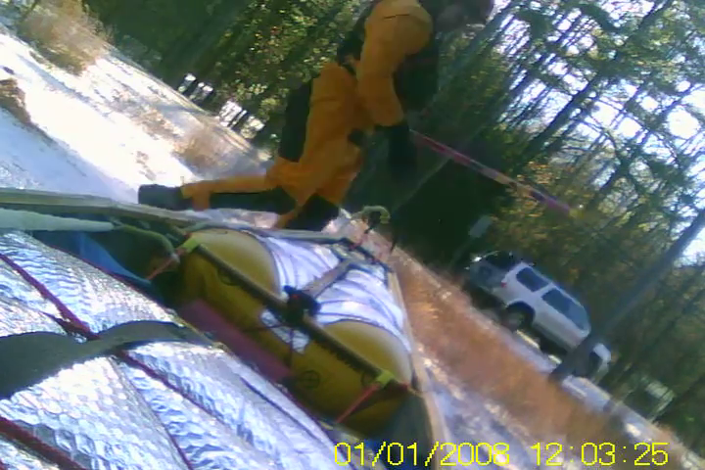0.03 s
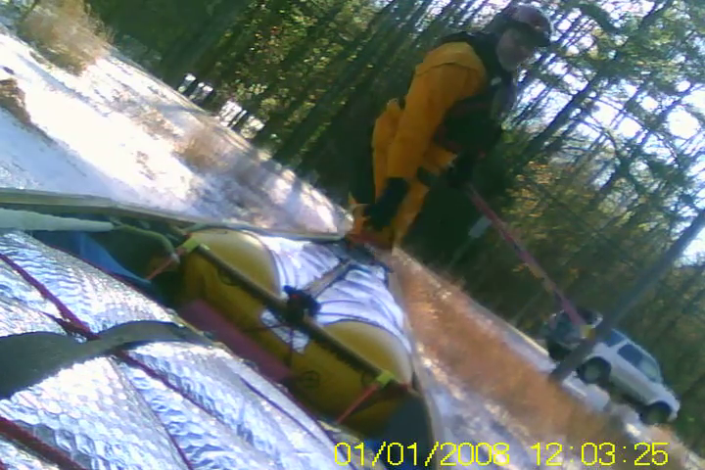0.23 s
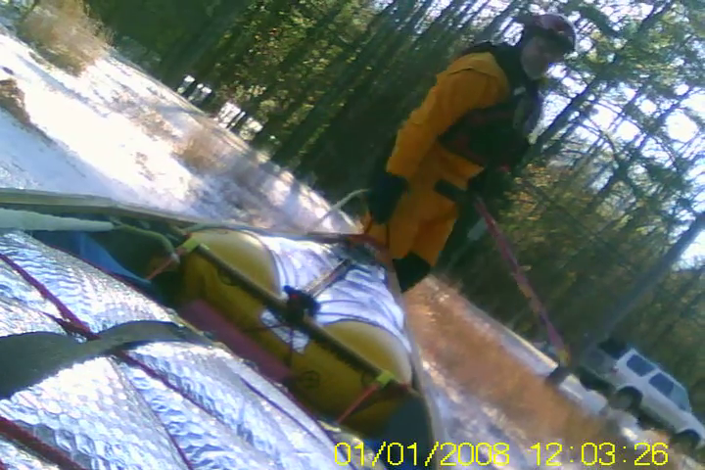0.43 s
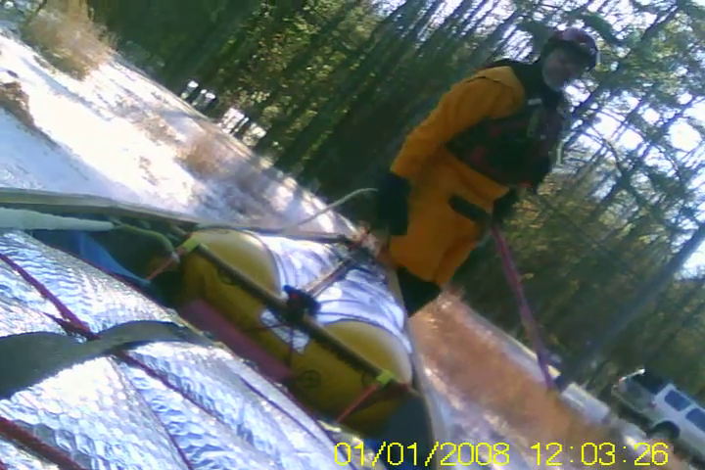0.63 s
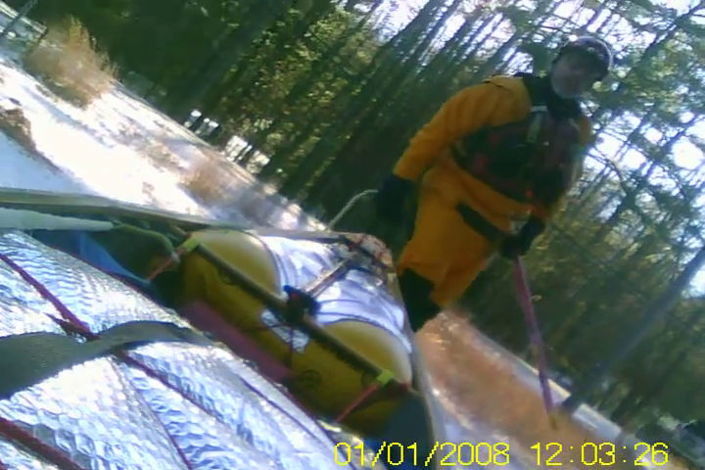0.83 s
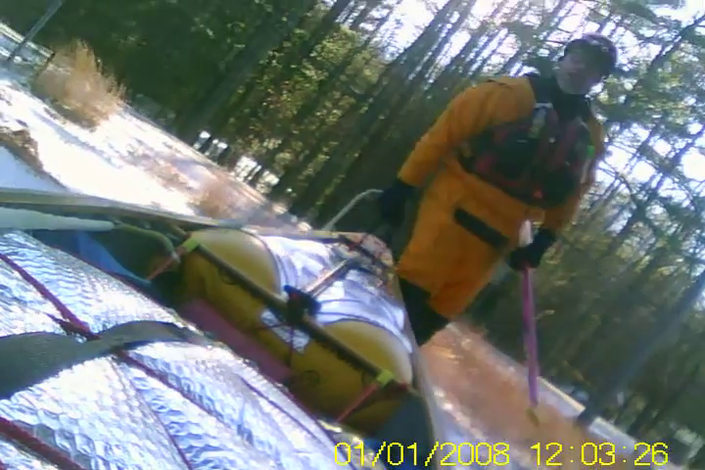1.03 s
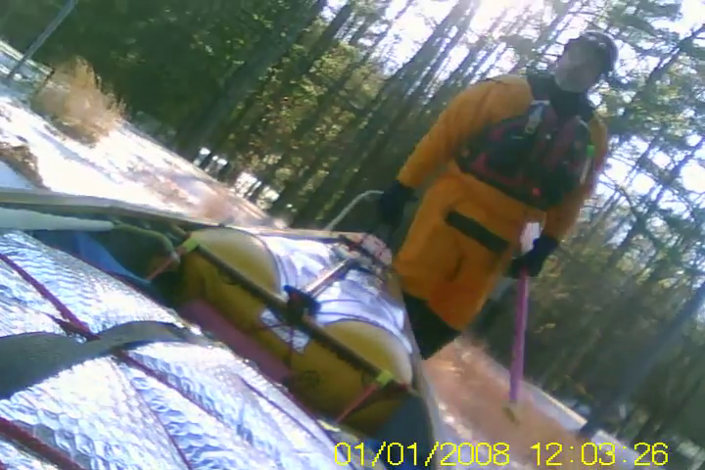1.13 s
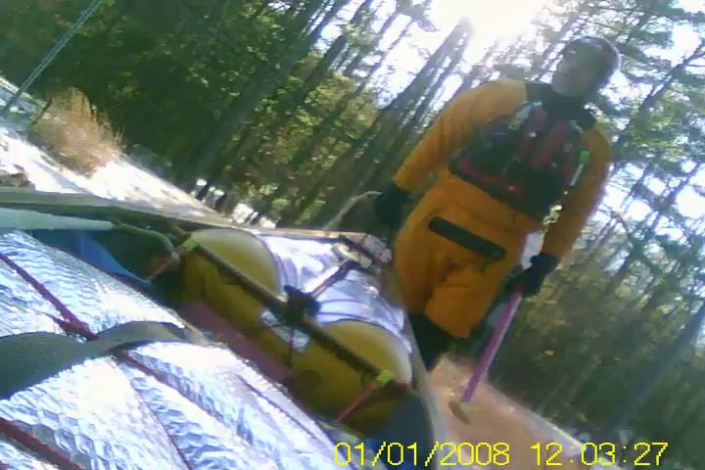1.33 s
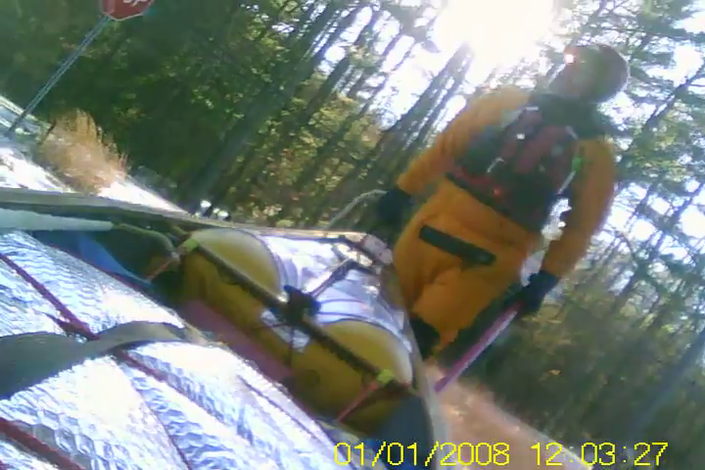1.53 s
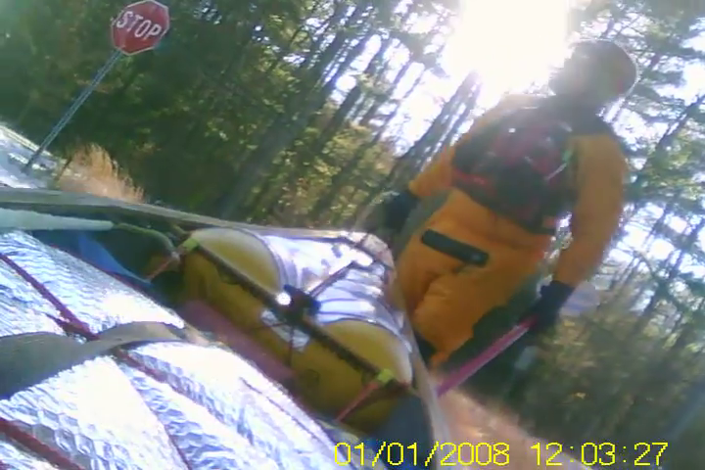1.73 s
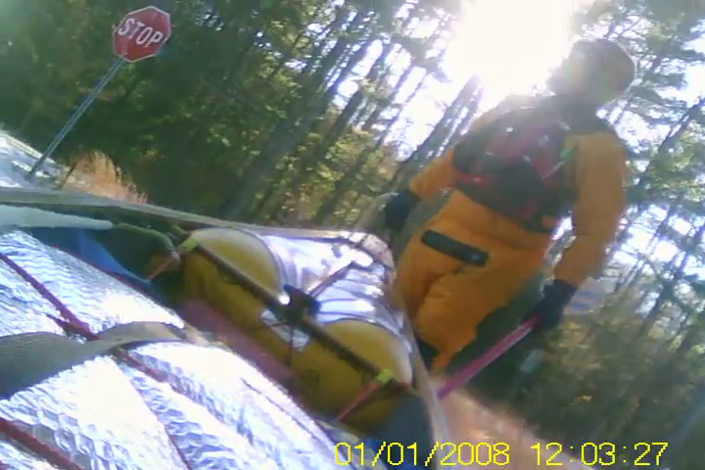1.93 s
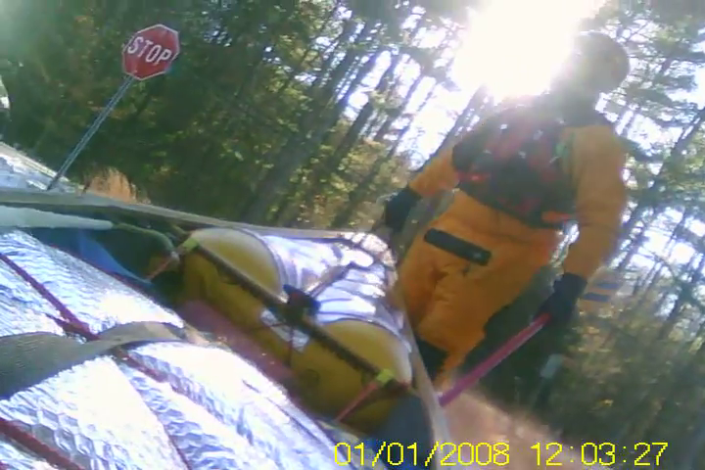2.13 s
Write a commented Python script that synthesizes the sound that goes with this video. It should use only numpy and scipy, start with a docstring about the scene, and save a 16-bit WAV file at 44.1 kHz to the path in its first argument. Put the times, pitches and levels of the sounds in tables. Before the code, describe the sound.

A loaded inflatable boat scrapes and crunches over crusty snow, with low rumbling bumps beneath

```python
"""Inflatable boat dragged over crusty snow

A loaded boat scrapes and crunches over the snow, heard through its hull by a camera strapped to it. Breaking
grains and crushed lumps ring the floor, panels and skin; each lump also sends a falling ripple. The load and
air tubes sway low, made from shaken resonances. The camera adds hiss, thin whines and ticks. Near the end,
during a lurch, the sound breaks off with a click and fades back to a quieter moment."""
import sys
import numpy as np
from scipy import signal
from scipy.fft import rfft, irfft
from scipy.io import wavfile
from scipy.ndimage import uniform_filter1d

SR = 44100
rng = np.random.default_rng(int(sys.argv[2]) if len(sys.argv) > 2 else 0)


def attenuation_scalar(level_db):
    """Turn a level in dB into a linear amplitude multiplier (20 dB per decade)."""
    decades = np.asarray(level_db, float) / 20
    return 10 ** decades


def digitize_waveform(pressure):
    """Quantize a signal to 16-bit integers and store it at the path in sys.argv[1].

    Rows of a 2-D input are taken as channels; values are limited to [-1, 1].
    """
    field = np.atleast_2d(pressure).T
    bounded = np.clip(field, -1, 1)
    quanta = np.round(bounded * 32767).astype(np.int16)
    wavfile.write(sys.argv[1], SR, quanta)


N = 97020  # length of the sound [samples]
JUMP_S = 2.0681  # when the sound breaks off [s]
TICK_START_S, TICKS_PER_S = .02157, 30.012

# Lumps crushed under the hull; the levels are those of the force, before it is shared out:
# (time [s], crackle [dB], knock [dB], thud [dB], length [s])
CRUNCHES = [(0.229, -53.5, -35.5, -35.5, 0.0026), (0.523, -54, -36, -33, 0.0031),
            (0.563, -45, -25, -29, 0.00514), (0.609, -46, -28, -30, 0.004),
            (0.671, -46.5, -27, -32, 0.0051), (0.721, -35, -16.5, -21.5, 0.0035),
            (0.793, -64, -35, -36, 0.0022), (0.851, -52, -27, -34, 0.0035), (0.921, -36, -15, -15, 0.00289),
            (0.949, -46, -26.5, -29, 0.0037), (0.987, -40, -18, -26.5, 0.0031),
            (1.001, -43, -36, -34.5, 0.0039), (1.025, -39.5, -22, -29, 0.0021),
            (1.069, -43.5, -25.5, -21.5, 0.0041), (1.096, -43, -22.5, -23.5, 0.0036),
            (1.213, -41, -27.5, -32, 0.0041), (1.249, -42, -25.5, -36.5, 0.0062),
            (1.334, -50, -53, -29, 0.0031), (1.35, -34.5, -21.5, -33.5, 0.0081),
            (1.368, -43, -33.5, -28.5, 0.0079), (1.645, -30, -34, -40, 0.00088),
            (1.67, -31, -25.5, -43, 0.0019)]
# Resonances of the air tubes: (frequency [Hz], width of one pass [Hz], relative level [dB])
TUBES = [(68.4, 15.6, -8.5), (94.4, 20.9, 0.5), (142, 8.1, -23.5)]


def rms_one(x):
    """Scale to an rms (average strength) of 1."""
    return x / np.sqrt(np.mean(x ** 2) + 1e-20)


def in_time(rows):
    """Draw each column of a table as a curve with a value at every sample."""
    times_s, *columns = np.transpose(rows)
    return [np.interp(np.arange(N) / SR, times_s, column) for column in columns]


def drift(rate_hz):
    """Slow random wandering with a spread of 1: noise smoothed twice."""
    r = np.exp(-2 * np.pi * rate_hz / SR)
    # the first second is thrown away so that the filter has settled
    return rms_one(signal.lfilter([1], [1, -2 * r, r * r], rng.standard_normal(N + SR))[SR:])


def body(force, resonances):
    """A part that rings at several pitches side by side, with white noise kept at about its own level."""
    out, power = 0, 0
    for k, (hz, width_hz, db) in enumerate(resonances):
        r = np.exp(-np.pi * width_hz / SR)
        b = (1 - r * r) / 2 * np.array([1, 0, -1])
        a = [1, -2 * r * np.cos(2 * np.pi * hz / SR), r * r]
        # two passes leave dark valleys between the resonances
        once = signal.lfilter(b, a, force + 1e-18)
        ring = signal.lfilter(b, a, once)
        out = out + (-1) ** k * attenuation_scalar(db) * ring  # signs alternate
        power += attenuation_scalar(db) ** 2 * width_hz * np.pi / 2 / SR
    return out / np.sqrt(power)


def grains(rate_db):
    """Random clicks of uneven size as snow crystals break, sparser and larger at low rates; rms 1."""
    grains_per_s, spread_db = 1500, 1.5  # average rate at 0 dB; scale of the random extra size
    sizes = attenuation_scalar(spread_db * np.minimum(rng.exponential(1, N), 5)) * rng.choice([-1, 1], N)
    breaks = rng.random(N) < grains_per_s * attenuation_scalar(rate_db) / SR
    return rms_one(sizes * breaks * attenuation_scalar(-rate_db / 2))


def crush(levels_db, lag_s, blow):
    """Force of crushed lumps: one blow (its share is "blow") plus crumbling that swells and dies away."""
    t = np.arange(N) / SR
    force = np.zeros(N)
    crumbs = rng.choice([-1, 1], N)
    for (start_s, *_, length_s), db in zip(CRUNCHES, levels_db):
        since = np.maximum(t - start_s - lag_s, 0) / max(length_s, .001)
        force += attenuation_scalar(db) * (1 - blow) * since * np.exp(1 - since) * crumbs
        blow_at = int((start_s + lag_s + length_s / 2) * SR)
        force[blow_at] -= attenuation_scalar(db) * blow * np.sqrt(length_s * SR)
    return force


def scrape():
    """Grains and crunches drive the boat's floor, panels, taut skin and highest rings, and boom its tubes."""
    # Grains under the skin, before and after the jump:
    # (time [s], deep rub [dB], rub [dB], fine scrape [dB])
    drag = [(0.03, -53, -60, -74), (0.22, -47, -51.5, -65.5), (0.39, -50, -45.5, -60),
            (0.75, -44, -45, -57), (0.95, -60, -35.5, -59), (1.09, -40, -40, -56), (1.3, -44, -37.5, -49),
            (1.36, -46.5, -32, -43.5), (1.53, -38.5, -31.5, -44.5), (1.8, -43, -29.5, -42),
            (1.92, -40, -29.5, -42), (2.03, -45, -32, -44), (2.06, -38, -27.5, -46)]
    drag_after = [(2.072, -43, -42, -55), (2.179, -54, -44.5, -59.5)]
    # Resonances of each part: (frequency [Hz], width of one pass [Hz], relative level [dB])
    floor_rings = [(151.6, 48, 0), (212.5, 41.7, -4), (311, 105, -5)]
    panel_rings = [(368, 72, 0.5), (432.4, 35, 3), (498.6, 116, -2), (593, 28, -5.5), (636.4, 53.5, -3)]
    skin_rings = [(856, 160, 3.5), (1112, 210, 0.5), (1322, 290, 0), (1730, 275, 1), (2172, 192, 0.5),
                  (2420, 422, 0.5), (2825, 25, -7)]
    sheen_rings = [(3060, 160, -18), (3190, 670, 1), (4080, 380, -6.5), (4250, 240, -2), (4590, 210, 2),
                   (5140, 190, -4.5)]
    body_lag_s, crackle_lead_s, sheen_lead_s = 0.0008, 0.00197, 0.0029
    knock_share, crackle_share = .7, .4  # part of a crunch that lands as one blow
    boom_db = -2  # share of each thud that drives the tubes

    deep_db, rub_db, fine_db = in_time(drag + drag_after)
    _, crackle_db, knock_db, thud_db, _ = np.transpose(CRUNCHES)
    below_peak_db = fine_db - fine_db.max()
    snow = grains(.5 * below_peak_db)  # the grain rate rises with the fine scrape
    flutter = drift(15.0)  # makes the scraping patchy
    low_patches_db = 1.2 * flutter

    thuds = crush(thud_db, body_lag_s, knock_share)
    floor = attenuation_scalar(deep_db + low_patches_db) * snow + .5 * thuds
    panels = attenuation_scalar(rub_db + low_patches_db) * snow + crush(knock_db, body_lag_s, knock_share)
    skin = attenuation_scalar(fine_db + .6 * flutter) * snow + crush(crackle_db, -crackle_lead_s, crackle_share)
    # the sheen mixes grains with smooth noise and swings more strongly than the fine scrape
    sheen_level = attenuation_scalar(-57.5 + 1.46 * below_peak_db + 1.3 * flutter)
    sheen = sheen_level * (0.4 * snow + 0.8 * rng.standard_normal(N))
    sheen = sheen + crush(crackle_db - 21.5, -sheen_lead_s, crackle_share)

    low = body(attenuation_scalar(boom_db) * thuds, TUBES) + body(floor, floor_rings)
    return low + body(panels, panel_rings) + body(skin, skin_rings) + body(sheen, sheen_rings)


def clack():
    """One lump sets a stiff part ringing: a single click through a resonance."""
    # The stiff part: (frequency [Hz], width of one pass [Hz], relative level [dB])
    stiff_part = [(1077, 88, 0)]
    click = attenuation_scalar(-9) * (np.arange(N) == int(1.349 * SR))  # struck at 1.349 s
    return body(click, stiff_part)


def ripples():
    """Thuds spread along the soft floor as short tones of falling pitch; the load drops onto the tubes."""
    # Drops of the load: (time [s], level [dB], frequency [Hz])
    load_bumps = [(1.088, -15, 50), (1.215, -12.5, 57)]
    ripple_db = -4.5  # compared with the thud
    top_hz, end_hz, fall_s = 551.6, 108.2, 0.01363  # the pitch falls from top towards end
    ripple_peak_s, bump_peak_s = .011, 0.012  # each tone swells for this long, then dies away

    t, out = np.arange(N) / SR, 0
    for start_s, _, _, thud_db, _ in CRUNCHES:
        since = np.maximum(t - start_s, 0)
        turns = end_hz * since + (top_hz - end_hz) * fall_s * (1 - np.exp(-since / fall_s))
        swell = since / ripple_peak_s * np.exp(1 - since / ripple_peak_s)
        out = out + attenuation_scalar(thud_db + ripple_db) * swell * np.sin(2 * np.pi * turns)
    for start_s, db, hz in load_bumps:
        since = np.maximum(t - start_s, 0)
        swell = since / bump_peak_s * np.exp(1 - since / bump_peak_s)
        out = out - attenuation_scalar(db) * swell * np.sin(2 * np.pi * hz * since)
    return out


def shaken(resonances):
    """Resonances shaken by rough ground (noise), their level held fairly even; rms 1."""
    evenness, window = 0.51, int(.022 * SR)  # 0 leaves the level free, 1 flattens it
    x = body(rng.standard_normal(N + SR // 4), resonances)[-N:]
    power = uniform_filter1d(uniform_filter1d(x * x, window), window)
    level = np.sqrt(power + 1e-9)
    return rms_one(x / level ** evenness)


def sway():
    """Load and tubes sway as shaken resonances; a last lurch rings as one low tone until the jump."""
    # Low sway up to the lurch and after the jump:
    # (time [s], load bounce [dB], slow rock [dB], tube boom [dB])
    sway_before = [(0.02, -32.5, -31, -40.5), (0.16, -40, -31.5, -40.5), (0.29, -30, -23.5, -28),
                   (0.37, -32, -28.5, -39.5), (0.52, -29.5, -23.5, -34.5), (0.66, -35, -36, -18.5),
                   (0.76, -41, -21, -35.5), (0.86, -29.5, -28, -38), (0.95, -25.5, -33, -18),
                   (1.02, -30.5, -21.5, -34.5), (1.13, -17, -24.5, -24), (1.21, -33, -22, -25),
                   (1.32, -22, -25.5, -45), (1.36, -17.5, -32, -15.5), (1.4, -20.5, -14, -33.5),
                   (1.58, -17.5, -23.5, -27), (1.72, -22.5, -23.5, -21), (1.78, -16, -56, -34.5),
                   (1.82, -21.5, -20.5, -32), (1.93, -41, -25.5, -40.5), (1.99, -22, -11, -26.5),
                   (2.03, -31, -14, -24)]
    sway_after = [(2.085, -23.5, -33, -28), (2.14, -38, -16.5, -47), (2.18, -22, -36, -48)]
    # Resonances of the rock and the bounce: (frequency [Hz], width of one pass [Hz], relative level [dB])
    rock = [(27.9, 7.4, 0)]
    bounce = [(43.82, 13.7, 0)]
    lurch_s, lurch_db, lurch_hz, lurch_t60_s = 2.0410, -4.5, 34.7, 3  # t60: time to fall by 60 dB

    bounce_db, rock_db, tube_db = in_time(sway_before + sway_after)
    t = np.arange(N) / SR
    since = np.maximum(t - lurch_s, 0)
    # the lurch takes hold over half a cycle and lasts until the jump
    grip = np.minimum(since * lurch_hz * 2, 1) * (t < JUMP_S)
    lurch = -attenuation_scalar(lurch_db - 60 * since / lurch_t60_s) * np.sin(2 * np.pi * lurch_hz * since) * grip
    free = attenuation_scalar(rock_db) * shaken(rock) + attenuation_scalar(bounce_db) * shaken(bounce) + attenuation_scalar(tube_db) * shaken(TUBES)
    return free * attenuation_scalar(-18 * grip) + lurch  # the lurch pins the free sway down


def high_hiss():
    """A high hiss that swells in and out: noise through one broad resonance."""
    # Times of the swell: start, full, full, end [s]
    swell_times = (1.86, 1.89, 2.0, 2.03)
    # The resonance: (frequency [Hz], width of one pass [Hz], relative level [dB])
    hiss_ring = [(7500, 610, -8)]
    swell = np.interp(np.arange(N) / SR, swell_times, [0, 1, 1, 0])
    return body(attenuation_scalar(-70.5) * swell * rng.standard_normal(N), hiss_ring)


def camera_hiss():
    """Electronic hiss: noise with a shaped spectrum, whose low part pulses once after each tick."""
    # Shape of the hiss: (frequency [Hz], relative level per Hz [dB])
    hiss_shape = [(300, -11), (800, 5.5), (2000, -8.5), (4000, -8), (7000, -9.5), (9500, -8.5),
                  (10800, -13), (12300, -37)]
    hiss_db = -62  # rms before the pulsing is added
    puff_lag_s, puff_depth, puff_top_hz = .013, .9, 1400

    hz, t = np.maximum(np.fft.rfftfreq(N, 1 / SR), 1), np.arange(N) / SR
    shape_hz, shape_db = np.transpose(hiss_shape)
    shape = attenuation_scalar(np.interp(np.log(hz), np.log(shape_hz), shape_db))
    hiss = attenuation_scalar(hiss_db) * rms_one(irfft(rfft(rng.standard_normal(N)) * shape, N))
    low = signal.sosfilt(signal.butter(2, puff_top_hz, fs=SR, output="sos"), hiss)
    pulse = np.cos(2 * np.pi * TICKS_PER_S * (t - TICK_START_S - puff_lag_s))
    return hiss + low * puff_depth * pulse


def camera_whines():
    """Thin steady whines of the electronics: pure tones."""
    # Whines: (frequency [Hz], rms level up to the jump [dB])
    whine_tones = [(5599, -82), (7402, -85), (9598, -91)]
    t = np.arange(N) / SR
    return sum(np.sqrt(2) * attenuation_scalar(db) * np.sin(2 * np.pi * hz * t) for hz, db in whine_tones)


def camera_ticks():
    """Faint regular tick of the electronics: short flat-topped pulses."""
    tick_db, width_s = -43.5, .00023  # height up to the jump
    since_tick = (np.arange(N) / SR - TICK_START_S) % (1 / TICKS_PER_S)
    return attenuation_scalar(tick_db) * (since_tick < width_s)


def camera():
    """All the noise of the electronics, 4 dB lower after the jump."""
    level = np.where(np.arange(N) / SR < JUMP_S, 1, attenuation_scalar(-4))
    return (camera_hiss() + camera_whines() + camera_ticks()) * level


def scene():
    """The boat as the camera hears it, on one channel."""
    boat = sway() + ripples() + scrape() + high_hiss() + clack()
    return (boat + camera())[None]


def band_limit(x):
    """A steep low-pass at the top of the band."""
    return signal.sosfilt(signal.butter(12, 12300, fs=SR, output="sos"), x)


def record(dry):
    """The sound drops to nothing at the jump and fades back; a low-pass filter cuts the top."""
    return_s, cutoff_hz = .006, 10530
    since = np.arange(N) / SR - JUMP_S
    gate = np.where(since < 0, 1, np.clip(since / return_s, 0, 1))
    mix = signal.sosfilt(signal.butter(8, cutoff_hz, fs=SR, output="sos"), dry * gate)
    return band_limit(mix)


dry = scene()
out = record(dry)
digitize_waveform(out)
```